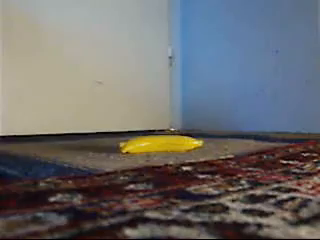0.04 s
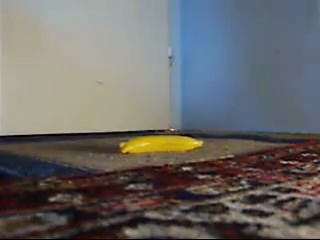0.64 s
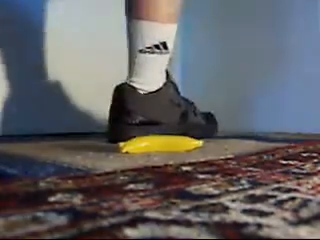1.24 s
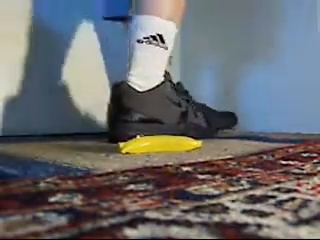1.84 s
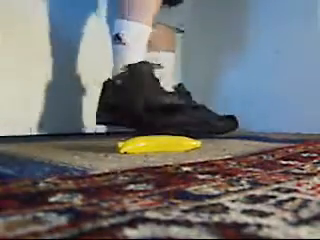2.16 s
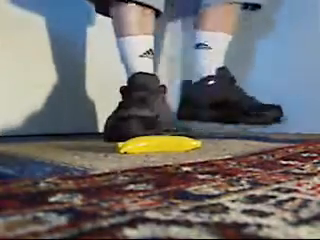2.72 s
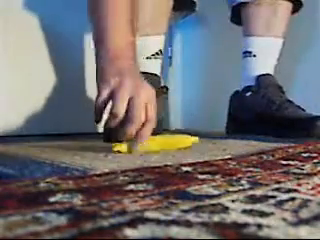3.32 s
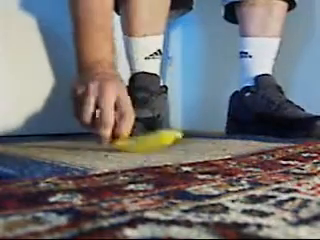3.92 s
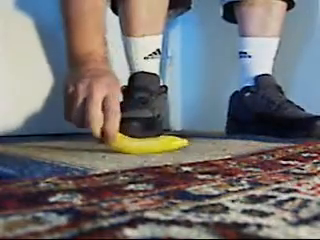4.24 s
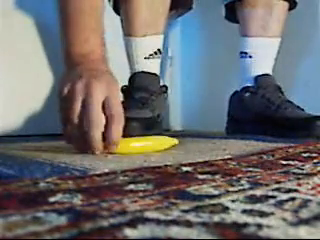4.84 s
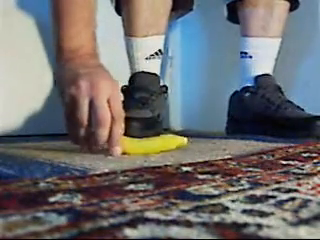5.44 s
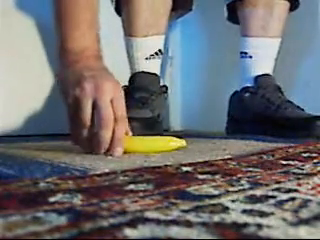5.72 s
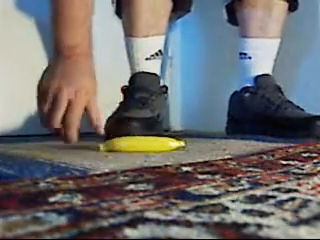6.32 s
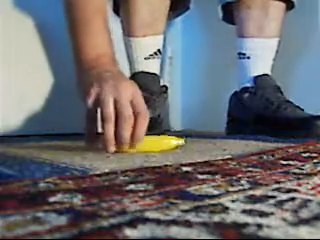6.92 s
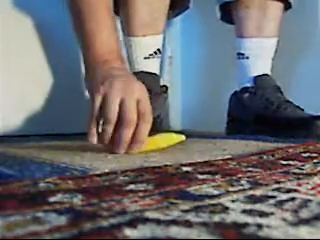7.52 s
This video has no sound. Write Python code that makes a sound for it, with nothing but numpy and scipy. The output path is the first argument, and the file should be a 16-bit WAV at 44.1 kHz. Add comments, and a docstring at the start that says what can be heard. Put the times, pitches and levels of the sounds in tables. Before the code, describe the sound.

Microphone hiss and a thin electronic whine switch on in a small, quiet carpeted room. Fingers brush the camera, which gives several close, dull knocks on the carpet. Someone in trainers walks up and shuffles into place, with booming floorboards, slapping and scuffing soles and swishing clothes. A plastic toy gives a tiny squeak and a brief snap as it is picked up. After that only faint cloth rustle, hum and hiss remain.

```python
"""A quiet room, microphone hiss and a thin electronic whine switch on. A camera is let go on
a carpet: fingers brush off it; it knocks, bounces and rings. Someone in trainers walks up over
a boarded floor and shuffles into place: boards boom, soles slap and scuff, clothes swish.
They pick up a plastic toy, which squeaks under a finger and clicks as its shell snaps."""
import sys
import numpy as np
from scipy import signal
from scipy.fft import rfft, irfft, next_fast_len
from scipy.io import wavfile

SR = 44100
rng = np.random.default_rng(int(sys.argv[2]) if len(sys.argv) > 2 else 0)


def to_wav(sig):
    """Store sig (one row per channel, or 1-D mono) as 16-bit WAV at the path in sys.argv[1].

    Samples outside -1..1 are clipped; the rate is SR.
    """
    pcm = np.clip(np.atleast_2d(sig), -1, 1) * 32767
    pcm = np.round(pcm).astype(np.int16)
    wavfile.write(sys.argv[1], SR, pcm.T)  # frames by channels


N = 333837
T = np.arange(N) / SR

# noise spectra: f/Hz, relative level/dB
ROOM_SPECTRUM = [(10, -5.5), (22, 3), (35, -8.5), (55, -2), (85, -9), (140, -11.5), (220, -12), (330, -12),
                 (520, -13.5), (700, -13), (1000, -17), (1300, -25.5), (2200, -28.5), (3500, -58)]
HISS_SPECTRUM = [(1500, 7), (3000, 8), (4500, 6.5), (6500, 8), (9000, 9), (10500, 2.5), (13000, 3)]
FIZZ_SPECTRUM = [(800, -6), (2200, 14.5), (3500, 6.5), (6500, 13), (10000, 10), (13000, 2)]  # grit and fibres
SWAY_SPECTRUM = [(8, -2), (15, 3.5), (28, -6), (50, -9), (120, -19.5), (250, -33), (600, -100)]  # floor giving
PUSH_SPECTRUM = [(12, -16.5), (25, -9), (50, -1), (120, -16.5), (250, -15.5), (600, -107)]  # shifting weight
CLOTH_SPECTRUM = [(150, 16), (500, 7), (1000, 6.5), (1900, 4.5), (3200, 3), (6500, 3.5), (10000, 0),
                  (13000, -14)]
SLAP_SPECTRUM = [(100, -2), (300, 4), (900, 18), (1400, 7), (2500, -10), (5000, -47)]  # sole on floor
CRACK_SPECTRUM = [(1000, -24), (2000, -8), (3000, -8), (4500, -13), (6200, -1), (9500, -8), (11300, -9),
                  (12500, -26)]  # snapping plastic

# camera's low bounce on the carpet (first row), then the ring of its case: f/Hz, relative level/dB, t60/s
BOUNCE_AND_RING = [(55, -10, 0.11), (235, 4, 0.027), (340, -23, 0.028), (1030, -15, 0.041)]
# modes of struck parts: f/Hz, relative level/dB, t60/s
BOARD_MODES = [(157, 1, 0.11), (270, -11, 0.095)]
SOLE_MODES = [(234, 0, 0.021), (347, -3, 0.081), (457, 2, 0.03), (774, -5.5, 0.025), (1015, -17, 0.063)]
TOY_MODES = [(2140, -15, 0.012), (6400, -3, 0.022), (7050, 6, 0.032), (9050, 5, 0.032), (10100, -7, .02),
             (11400, -18, 0.03)]

# distant motor, rumble: f/Hz, width/Hz, level/dB
MOTOR_BANDS = [(48.9, 8.6, -61), (73.9, 14, -66.5), (617, 41, -75.5)]
# distant motor, note: harmonic number, level/dB
MOTOR_HARMONICS = [(1, -68.5), (2, -71)]
# electronic tones: f/Hz, relative level/dB
WHINE_TONES = [(3634, -74), (4011, -74), (4463, -84), (4840, -84), (7870, -60), (8247, -60), (11273, -83),
               (11649, -83), (12102, -78), (12484, -77)]
# electronic chirp: position/cycle, offset from centre/Hz, relative level/dB
CHIRP_CYCLE = [(0, 1530, -3), (.12, 1160, 2), (.28, 800, 3), (.45, 1170, 1), (.65, 1480, -9),
               (.82, 1530, -2)]
# fingers on the camera: t/s, half-length/s, level/dB, f/Hz, glide/(Hz/s), width/Hz, fizz/dB re brush
FINGER_BRUSHES = [(0.25, 0.011, -39.5, 1240, 0, 1420, -13), (.44, 0.028, -43, 1090, -6000, 913, -9.5),
                  (0.593, 0.036, -44.5, 1840, 11000, 850, -10)]
# knocks on the camera: t/s, level/dB, f/Hz
CAMERA_KNOCKS = [(0.2696, -21.5, 583), (0.285, -24.5, 496), (0.3092, -33, 600), (0.3428, -15.5, 450),
                 (0.513, -26.5, 484), (0.6216, -31, 630), (0.6887, -31, 596), (.7070, -23.5, 497)]
# weight on the floor nearby: middle t/s, half-length/s, level/dB
FLOOR_LEANS = [(.275, 0.052, -38), (.495, 0.096, -40.5), (1.24, 0.084, -44), (3.03, 0.17, -45.5)]
# camera, then soles, on carpet; lower when pressed harder: middle t/s, half-length/s, level/dB, f/Hz
CARPET_DRAGS = [(.279, 0.051, -40, 480), (0.354, 0.066, -44.5, 348), (0.516, 0.061, -49, 298),
                (0.679, 0.23, -49, 426), (1.022, 0.025, -50.5, 740), (1.189, 0.13, -51, 260),
                (1.239, 0.027, -50.5, 1260), (1.35, 0.16, -57.5, 636), (1.474, 0.054, -55, 845),
                (1.88, 0.11, -49, 300), (1.965, 0.037, -44, 566), (2.559, 0.12, -56.5, 596)]
# sleeves and trouser legs: middle t/s, half-length/s, level/dB, rustle/dB re swish
CLOTH_SWISHES = [(0.298, 0.1, -63, 8.5), (.55, 0.33, -59, 0.5), (.755, 0.12, -54, -10.5),
                 (1.042, 0.39, -59, -2.5), (1.223, .09, -55.5, -1), (1.405, 0.14, -58, -5),
                 (1.92, 0.31, -68, -5), (2.546, 0.8, -64, -9), (2.97, 0.11, -55.5, -18),
                 (3.225, 0.27, -61, -22), (3.905, 0.043, -63, -19), (6.324, 0.085, -67.5, -1),
                 (6.606, .13, -70.5, 3.5)]
# heels and soles landing: t/s, thump/dB, thump f/Hz, thump t60/s, slap/dB, click/dB
LANDINGS = [(1.109, -20.5, 109.6, 0.071, -34, -56), (1.2686, -23.5, 124, 0.037, -44, -58),
            (1.7918, -16.5, 97.7, 0.12, -42, -59), (1.859, -26, 123, 0.11, -41, -66),
            (1.903, -28, 184, 0.017, -38.5, -66), (2.566, -34, 127, 0.02, -48.5, -57),
            (2.64, -32, 115, 0.079, -34, -50), (2.882, -31, 89.5, 0.062, -32, -44),
            (2.909, -27.5, 124, 0.059, -37, -58)]
# light taps of a rolling foot: t/s, slap/dB
SOLE_TAPS = [(1.161, -44), (1.2786, -36), (1.317, -44.5), (1.3426, -41), (1.356, -38), (1.45, -40),
             (1.608, -46)]
# finger slipping on the toy: f/Hz, width/Hz, relative level/dB
SQUEAK_BANDS = [(5900, 370, 1), (10170, 250, -7)]
# snaps of the toy's shell: t/s, level/dB
TOY_SNAPS = [(3.607, -47.5), (3.6255, -41), (3.627, -36.5), (3.6285, -35), (3.641, -59), (3.652, -58)]


def amp(db):
    """Decibels to gain."""
    return 10 ** (np.asarray(db) / 20)


def unit(x):
    """Scale to rms 1."""
    return x / np.sqrt(np.mean(x ** 2) + 1e-20)


def add(mix, at_s, sound):
    """Mix a sound in at a time."""
    part = mix[round(at_s * SR):][:len(sound)]
    part += sound[:len(part)]


def noise(spectrum):
    """Shaped noise, rms 1."""
    hz, db = np.transpose(spectrum)
    colour = amp(np.interp(np.log(np.fft.rfftfreq(N, 1 / SR) + 1), np.log(hz + 1), db))
    return unit(irfft(rfft(rng.standard_normal(N)) * colour, N))


def band(hz, width_hz, size=next_fast_len(N)):
    """Noise in one steep resonance, rms 1, at most N samples."""
    f = np.fft.rfftfreq(size, 1 / SR) + 1
    detune = (f ** 2 - hz ** 2) / (f * width_hz)
    return unit(irfft(rfft(rng.standard_normal(size)) / (1 + detune ** 2 / 2) ** 2, size))[:N]


def ring(modes, t):
    """Decaying modes; neighbours move in opposite directions."""
    return sum((-1) ** k * amp(db - 60 * t / t60_s) * np.sin(2 * np.pi * hz * t)
               for k, (hz, db, t60_s) in enumerate(modes))


def swell(t, middle_s, half_s, order=3):
    """Rise and fall of contact; lower order, softer edges."""
    return np.exp(-2 * abs((t - middle_s) / half_s) ** order)


def strokes(rows, order=3):
    """Envelope of several swells, summed in power."""
    return np.sqrt(sum((amp(db) * swell(T, at_s, half_s, order)) ** 2 for at_s, half_s, db in rows))


def catching(depth_db, rate_hz):
    """Catch and slip: a quick random flutter of level."""
    return unit(amp(depth_db * band(rate_hz, 2 * rate_hz)))


def background(room_db=-56.5, hiss_db=-61, motor_hz=438, waver_hz=1.532):
    """Room rumble, a distant motor's hum and wavering note, microphone hiss."""
    hum = sum(amp(db) * band(hz, width_hz) for hz, width_hz, db in MOTOR_BANDS)
    cycles = np.cumsum(motor_hz + waver_hz * band(hz=2.02, width_hz=4)) / SR
    note = sum(amp(db) * unit(np.sin(2 * np.pi * k * cycles)) for k, db in MOTOR_HARMONICS)
    return amp(room_db) * noise(ROOM_SPECTRUM) + hum + note + amp(hiss_db) * noise(HISS_SPECTRUM)


def whine(tones_gain_db=0.8, centre_hz=8057, chirps_per_s=24.97, lower_db=-72, upper_db=-75, jitter_hz=8):
    """Camera electronics: tones drifting together, plus a chirping pair mirrored about a centre."""
    drift_hz = band(hz=6.7, width_hz=5.4)
    clock_s = T + np.cumsum(drift_hz) / SR / centre_hz
    tones = sum(amp(db + tones_gain_db) * np.sin(2 * np.pi * (hz * clock_s + rng.random()))
                for hz, db in WHINE_TONES)
    position, *columns = np.transpose(CHIRP_CYCLE)
    offset_hz, chirp_db = (np.interp(T * chirps_per_s, position, c, period=1) for c in columns)
    sweep_rad = 2 * np.pi * np.cumsum(offset_hz + jitter_hz * band(hz=30, width_hz=60)) / SR
    centre_rad = 2 * np.pi * centre_hz * clock_s
    lower = amp(lower_db) * np.sin(centre_rad - sweep_rad)
    upper = amp(upper_db) * np.sin(centre_rad + sweep_rad)
    return np.sqrt(2) * (tones + amp(chirp_db) * (lower + upper))


def brushes(skew=1.42, lead_s=0.1):
    """Skin slides on the case: a grainy swish gliding with finger speed, slower to fade than to rise."""
    out, t = np.zeros(N), T[:SR // 4]
    fizz, catch = noise(FIZZ_SPECTRUM), catching(depth_db=2.5, rate_hz=147)
    for at_s, half_s, db, hz, glide_hz_per_s, width_hz, fizz_db in FINGER_BRUSHES:
        here = round((at_s - lead_s) * SR) + np.arange(len(t))
        contact = swell(t, lead_s, half_s * np.where(t > lead_s, skew, 1 / skew), order=2)
        glide = np.exp(1j * np.pi * glide_hz_per_s * (t - lead_s) ** 2)
        swish = (signal.hilbert(band(hz, width_hz, len(t))) * glide).real
        add(out, at_s - lead_s, amp(db) * contact * (swish + amp(fizz_db) * fizz[here]))
    return out * catch


def knocks(bounce_and_ring_db=-23, body_db=-10, body_ratio=0.45, muffle_hz=1200,
           rebound_above_db=-20, rebound_s=0.00331, rebound_db=-8.5, lead_s=0.008):
    """A quick and a slow push-pull, then the camera's low bounce on the carpet and its case's ring."""
    out, t = np.zeros(N), T[:SR // 10]
    for at_s, db, hz in CAMERA_KNOCKS:
        phase = 2 * np.pi * hz * (t - lead_s)
        quick, slow = (-u * np.exp((1 - u ** 2) / 2) for u in (phase, phase * body_ratio))
        pulse = quick + amp(body_db) * slow  # slow: the whole body moves
        for k in range(3 if db > rebound_above_db else 1):  # hard knocks rebound twice
            add(out, at_s + k * rebound_s - lead_s, amp(db + k * rebound_db) * pulse)
        add(out, at_s, amp(db + bounce_and_ring_db) * ring(BOUNCE_AND_RING, t))
    case_lowpass = 1 / (1 + (np.fft.rfftfreq(N, 1 / SR) / muffle_hz) ** 10)
    return irfft(rfft(out) * case_lowpass, N)


def ticks(re_knock_db=-29, decay_s=0.0047):
    """The plastic case ticks at the onset of each knock."""
    envelope, t = np.zeros(N), T[:SR // 20]
    for at_s, db, hz in CAMERA_KNOCKS:
        add(envelope, at_s - 1 / (np.pi * hz), amp(db + re_knock_db) * np.exp(-t / decay_s))
    return envelope * noise(FIZZ_SPECTRUM)


def leans():
    """The floor gives under shifting weight: a deep rumble."""
    return noise(SWAY_SPECTRUM) * strokes(FLOOR_LEANS)


def scuffs(width_hz=626, fizz_db=-18.5, push_db=-5.5, lead_s=0.24,
           settle_db=-11.5, settle_hz=376, rise_s=0.0093, fade_s=0.043):
    """Carpet rubbed by drags and by soles settling after landing: dull swish, fizz above, push below."""
    out, t = np.zeros(N), T[:SR // 2]
    settle = (1 - np.exp(-t / rise_s)) * np.exp(-t / fade_s)
    rubs = [(at_s - lead_s, amp(db) * swell(t, lead_s, half_s), hz)
            for at_s, half_s, db, hz in CARPET_DRAGS]
    rubs += [(at_s, amp(slap_db + settle_db) * settle, settle_hz) for at_s, *_, slap_db, _ in LANDINGS]
    fizz, push = noise(FIZZ_SPECTRUM), noise(PUSH_SPECTRUM)
    catch = catching(depth_db=2, rate_hz=147)
    for at_s, contact, hz in rubs:
        here = round(at_s * SR) + np.arange(len(t))
        swish = band(hz, width_hz, len(t)) + amp(fizz_db) * fizz[here]
        add(out, at_s, contact * (catch[here] * swish + amp(push_db) * push[here]))
    return out


def clothes():
    """Cloth slides on cloth: wide, soft swishes and a rustle from the folds."""
    swish = noise(CLOTH_SPECTRUM) * strokes([row[:3] for row in CLOTH_SWISHES], order=2)
    folds = [(at_s, half_s, db + rustle_db) for at_s, half_s, db, rustle_db in CLOTH_SWISHES]
    rustle = band(hz=1770, width_hz=1460) * strokes(folds, order=2)
    return (swish + rustle) * catching(depth_db=1, rate_hz=89)


def footfalls(rise_per_t60=0.051, boards_db=-13, sole_db=-2, puff_db=-5, puff_s=0.007, click_s=0.0086,
              tap_thump_db=1, tap_hz=107, tap_t60_s=0.044, tap_click_db=-16):
    """Boards boom under the weight, the sole slaps, grit clicks; a tap is a small footfall."""
    out, t = np.zeros(N), T[:SR // 4]
    puff, grit = noise(SLAP_SPECTRUM), noise(FIZZ_SPECTRUM)
    taps = [(at_s, db + tap_thump_db, tap_hz, tap_t60_s, db, db + tap_click_db) for at_s, db in SOLE_TAPS]
    for at_s, thump_db, hz, t60_s, slap_db, click_db in LANDINGS + taps:
        here = round(at_s * SR) + np.arange(len(t))
        load = 1 - np.exp(-t / (rise_per_t60 * t60_s))  # a long tread builds slowly
        thump = load * (ring([(hz, 0, t60_s)], t) + amp(boards_db) * ring(BOARD_MODES, t))
        slap = amp(sole_db) * ring(SOLE_MODES, t) + amp(puff_db) * puff[here] * np.exp(-t / puff_s)
        click = grit[here] * np.exp(-t / click_s)
        add(out, at_s, amp(thump_db) * thump + amp(slap_db) * slap + amp(click_db) * click)
    return out


def toy(start_s=3.58, squeak_db=-52, shell_db=-7, crack_db=-3, crack_s=0.0011,
        crackle_db=-54, grain_db=2.5):
    """A finger squeaks on the plastic; the shell snaps amid a loose crackle."""
    out, t = np.zeros(N), T[:SR // 10]
    crack = noise(CRACK_SPECTRUM)
    squeak = sum(amp(db) * band(hz, width_hz, len(t)) for hz, width_hz, db in SQUEAK_BANDS)
    add(out, start_s, amp(squeak_db) * squeak * swell(t, middle_s=0.029, half_s=0.01))
    for at_s, db in TOY_SNAPS:
        burst = crack[round(at_s * SR):][:len(t)] * np.exp(-t / crack_s)
        add(out, at_s, amp(db) * (amp(shell_db) * ring(TOY_MODES, t) + amp(crack_db) * burst))
    grains = unit(amp(grain_db * band(hz=300, width_hz=600, size=len(t))))
    crackle = crack[:len(t)] * grains * swell(t, middle_s=0.055, half_s=0.028)
    add(out, start_s, amp(crackle_db) * crackle)
    return out


def room(x, wet_db=-15, t60_s=0.3, echoes_per_s=2000, predelay_s=0.004):
    """Small carpeted room: a short, faint tail."""
    t = T[:SR // 2]
    echoes = rng.standard_normal(len(t)) * (rng.random(len(t)) < echoes_per_s / SR) * (t > predelay_s)
    tail = echoes * amp(-60 * t / t60_s)
    return x + amp(wet_db) * signal.fftconvolve(x, tail / np.linalg.norm(tail))[:N]


def scene():
    """Handling and floor flex reach the microphone directly; shoes, scuffs, clothes and toy reverberate."""
    direct = knocks() + ticks() + brushes() + leans()
    airborne = footfalls() + scuffs() + clothes() + toy()
    return (direct + room(airborne) + background() + whine())[None]


def record(dry, switch_on_s=0.165, ramp_s=0.002, cutoff_hz=12850):
    """Microphone switch-on, then the band limit."""
    live = dry * np.clip((T - switch_on_s) / ramp_s, 0, 1)
    lowpass = signal.firwin(511, cutoff_hz, window=("kaiser", 9), fs=SR)
    return signal.oaconvolve(live, lowpass[None], "same")


dry = scene()
out = record(dry)
to_wav(out)
```